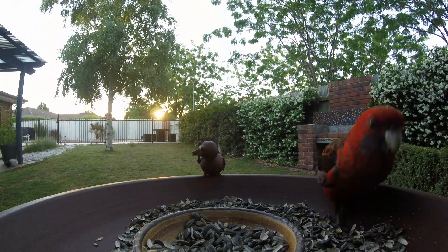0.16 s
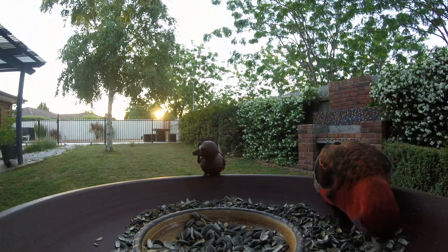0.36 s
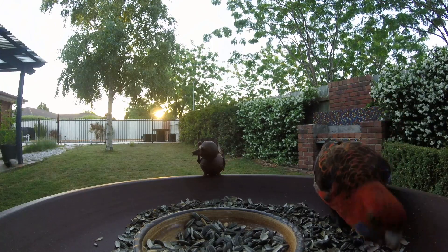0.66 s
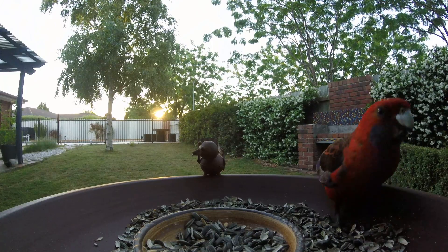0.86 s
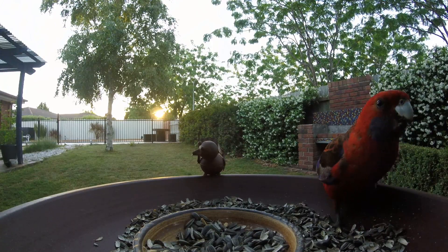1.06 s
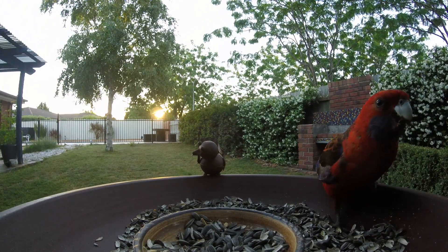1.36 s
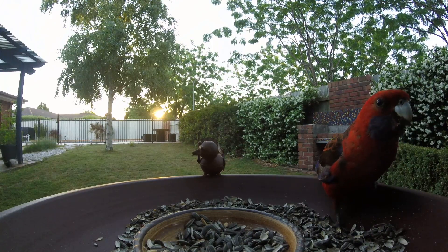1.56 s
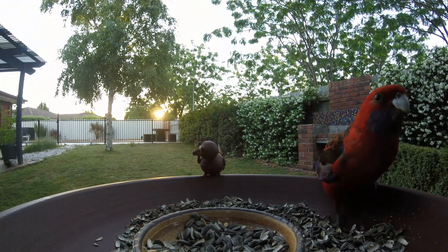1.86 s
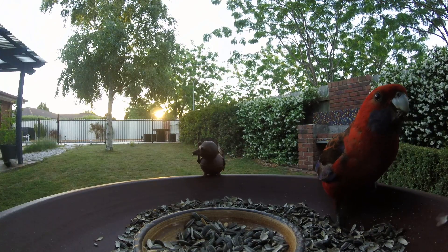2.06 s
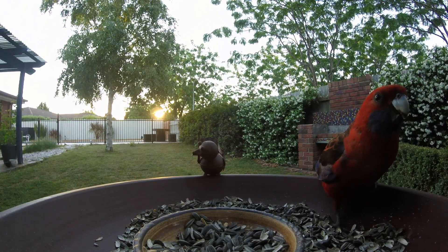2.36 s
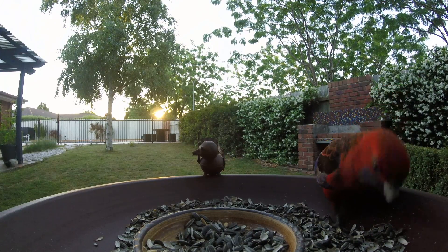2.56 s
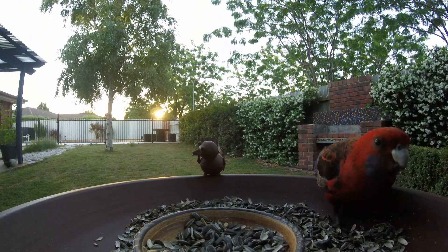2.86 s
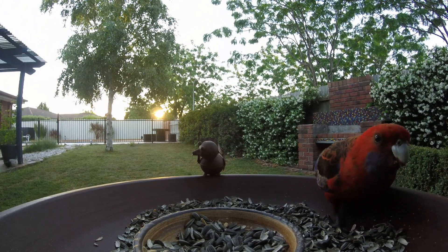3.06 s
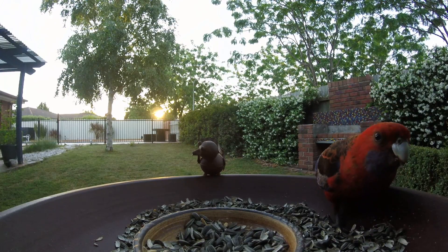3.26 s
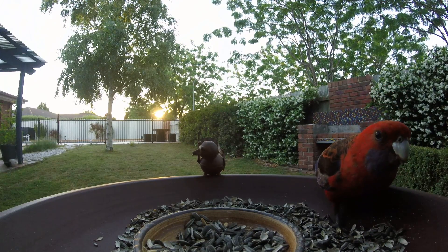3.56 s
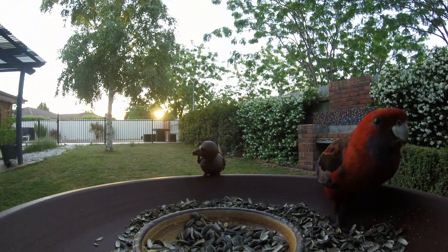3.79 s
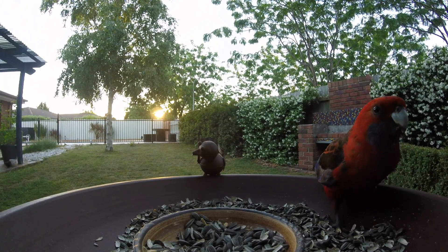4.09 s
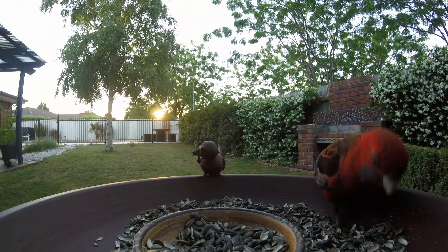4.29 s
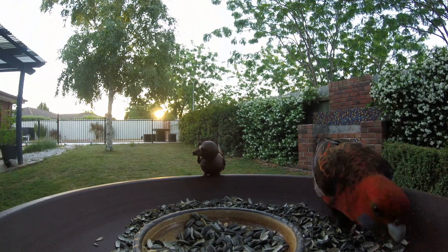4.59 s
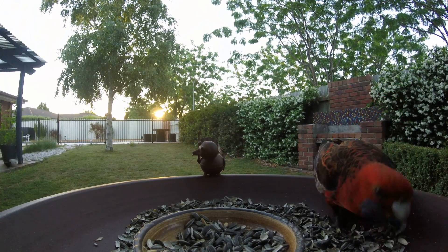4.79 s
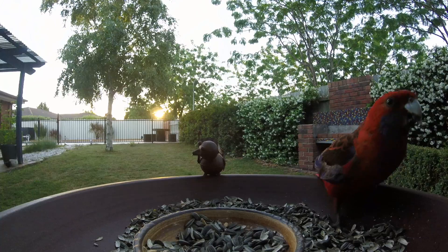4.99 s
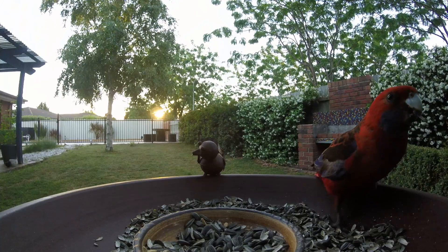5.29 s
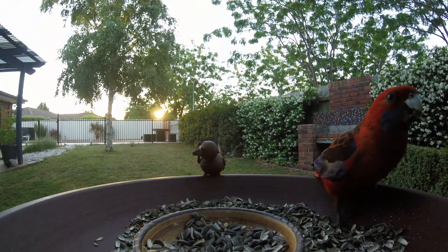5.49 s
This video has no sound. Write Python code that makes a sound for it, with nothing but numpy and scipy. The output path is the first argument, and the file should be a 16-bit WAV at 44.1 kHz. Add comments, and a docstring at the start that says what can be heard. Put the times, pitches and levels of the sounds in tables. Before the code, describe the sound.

A parrot feeds on seeds in a wide dish, right beside a microphone mounted on it. A light tap is followed by short beak scrapes and a peck that sets the dish booming low. A shell snaps sharply, smaller cracks follow, and a husk hits the rim with a bright, ringing clack. Near the end come more scrapes and a faint seed rustle. A quiet garden rushes softly behind.

```python
"""A parrot feeds on a wide dish in a quiet garden, right by a microphone mounted on that dish.
Its beak digs in the seeds, drags over the dish and thumps it; husks drop on the rim and make it ring.
Contacts knock the microphone mount too, and the bird's shifting weight makes the stand hum.
Seeds snap in the beak, close up, with the soft rush of the garden behind."""
import sys
import numpy as np
from scipy import signal
from scipy.fft import rfft, irfft
from scipy.io import wavfile
from scipy.ndimage import uniform_filter1d

SR = 44100
rng = np.random.default_rng(int(sys.argv[2]) if len(sys.argv) > 2 else 0)


def store_pcm(level_fs):
    """Save levels as 16-bit WAV."""
    pcm = np.round(np.clip(level_fs, -1, 1) * 32767).astype(np.int16)
    wavfile.write(sys.argv[1], SR, np.atleast_2d(pcm).T)


N = 248724

# The dish wall's dense, quickly dying modes. Each row: frequency in Hz, relative level in dB per Hz.
CLACK_SPECTRUM = [(400, -21), (950, -9), (1150, 1), (1400, 10.5), (1600, -26), (2100, -4), (2500, 1),
                  (3100, 0), (3800, -15.5), (6400, -18.5), (7500, -27), (14000, -47)]
# The mount's high resonances. Each row: frequency in Hz, relative level in dB, t60 in seconds.
MOUNT_MODES = [(2910, -18, 0.025), (3207, 1.5, 0.081), (4520, -5, 0.049), (5030, -3, 0.032),
               (6420, 1.5, 0.057), (6670, -9, 0.042), (10100, -20, .03)]
# The bird bows to the dish or straightens up.
# Each row: start in seconds, length in seconds, seed level in dB, stand level in dB.
BIRD_MOVES = [(0, 0.35, -75, -56.5), (0.876, 0.051, -66, -58), (2.6, .33, -71.5, -56.5),
              (4.435, 0.53, -66, -53)]


def amp(db):
    """Decibels to gain."""
    return 10 ** (np.asarray(db) / 20)


def unit_rms(x):
    """Scales to rms 1."""
    return x / np.sqrt(np.mean(x ** 2) + 1e-20)


def peaked(x, size=128):
    """Scales so that the loudest few milliseconds swing to about 1."""
    return x / (2 * np.sqrt(uniform_filter1d(x ** 2, size).max()) + 1e-20)


def add(mix, start, sound):
    """Mixes a sound in at a start given in seconds."""
    part = mix[max(round(start * SR), 0):][:len(sound)]
    part += sound[:len(part)]


def noise(spectrum, size):
    """Noise of rms 1 with a spectrum of (Hz, dB) points."""
    hz, db = np.transpose(spectrum)
    colour = amp(np.interp(np.log(np.fft.rfftfreq(size, 1 / SR) + 1), np.log(hz + 1), db))
    return unit_rms(irfft(rfft(rng.standard_normal(size)) * colour, size))


def ring(modes, t, polarity=1):
    """Dying (Hz, dB, t60) modes; at polarity -1 neighbours start opposed, so the ring builds up."""
    return sum(polarity ** k * amp(db - 60 * t / t60) * np.sin(2 * np.pi * hz * t)
               for k, (hz, db, t60) in enumerate(modes))


def garden(level_db=-55):
    """The soft, steady rush of the garden behind the feeder."""
    # Each row: frequency in Hz, relative level in dB per Hz.
    rush_spectrum = [(12, -26), (20, -7), (37, 1), (59, -2.5), (92, -3), (115, -3), (143, -2.5),
                     (229, -6.5), (525, -11), (674, -13.5), (841, -15), (1080, -16), (6360, -31),
                     (7300, -33.5), (15000, -45.5)]
    return amp(level_db) * noise(rush_spectrum, N)


def effort(start, length, build_db_per_s=45, settle_db_per_s=37):
    """Gain that builds up before a move of the bird, holds at 1 during it and settles after it."""
    t = np.arange(N) / SR
    before, after = np.maximum(start - t, 0), np.maximum(t - start - length, 0)
    return amp(-build_db_per_s * before - settle_db_per_s * after)


def stand_sway(perched_db=-67):
    """The bird's shifting weight hums in the low modes of the stand, with a dull rumble."""
    modes = [(31.6, 1, .58), (60, -12, .31), (89, -5, 1), (109, -8, .62), (130.6, -5.5, .42)]
    stand = ring(modes, np.arange(SR) / SR)
    weight = rng.standard_normal(N + len(stand) - 1)
    hum = unit_rms(signal.fftconvolve(weight, stand, "valid"))
    rumble = noise([(10, 3), (30, -2.5), (70, -3), (130, -10), (250, -22.5), (700, -60)], N)
    gain = amp(perched_db) + sum(effort(start, length) * amp(db) for start, length, _, db in BIRD_MOVES)
    return gain * unit_rms(hum + rumble)


def mount_knock(hz, t):
    """The microphone mount's damped low modes, whose pitch shifts with the place of contact."""
    # Each row: multiple of the knock pitch, relative level in dB, t60 in seconds.
    knock_modes = [(.86, -38, 0.046), (.945, 6, 0.061), (1.002, 11, 0.051), (1.045, 4.5, 0.032)]
    return ring([(hz * multiple, db, t60) for multiple, db, t60 in knock_modes], t)


def seed_rustle(taps_per_s=260, spread_db=3, knock_hz=1345, mount_db=-15, husk_db=-13, husk_t60=.018):
    """Loose seeds tap the dish lightly as the bird moves: a dry rustle coloured by the mount."""
    t = np.arange(SR // 4) / SR
    strength = amp(spread_db * np.minimum(rng.exponential(1, N), 4)) * rng.choice([-1, 1], N)
    taps = strength * (rng.random(N) < taps_per_s / SR)
    husk = amp(husk_db - 60 * t / husk_t60) * noise(CLACK_SPECTRUM, len(t))
    seed = mount_knock(knock_hz, t) + amp(mount_db) * ring(MOUNT_MODES, t) + husk
    gain = sum(effort(start, length) * amp(db) for start, length, db, _ in BIRD_MOVES)
    return gain * unit_rms(signal.fftconvolve(taps, seed)[:N])


def seed_snaps(hollow_hz=2650, hollow_db=-10.5, hollow_t60=.018, splinter_db=-11, splinter_t60=.013):
    """A shell splits: a few bright cycles, splinters, and a short knock in the hollow of the beak."""
    # Each row: start in seconds, level in dB, main pitch in Hz, t60 in seconds.
    splits = [(1.381, -39.5, 6450, .0045), (1.731, -53.5, 7200, .006), (1.7695, -52, 7250, .012),
              (1.866, -57, 7600, .006), (1.924, -61, 7400, .008), (4.625, -56, 8400, .022)]
    splinter_spectrum = [(1500, -25), (5000, -6), (7000, 2), (8400, 2), (9500, -12), (15000, -14)]
    out, t = np.zeros(N), np.arange(SR // 20) / SR
    attack = 1 - np.exp(-t / .00014)
    for start, db, hz, t60 in splits:
        crack = ring([(hz, 0, t60), (hz * 1.13, -8, t60), (hollow_hz, hollow_db, hollow_t60)], t)
        splinters = amp(splinter_db - 60 * t / splinter_t60) * noise(splinter_spectrum, len(t))
        add(out, start, amp(db) * peaked((crack + splinters) * attack))
    return out


def slips(length):
    """Force of a drag: a swell of tiny slips."""
    size = round(length * SR)
    return rng.standard_normal(size) * (rng.random(size) < .15) * signal.windows.tukey(size, .6)


def chatter(force, hz, share):
    """A dragging beak partly slips in step with a resonance."""
    t = np.arange(len(force)) / SR
    return force + share * np.sin(2 * np.pi * hz * t) * signal.windows.tukey(len(force), .4)


def strike(force, knock_hz, knock_db, ring_db, clack_db, tick_db, chatter_hz=0,
           clack_t60=.16, tick_t60=.049, mount_db=-1):
    """A contact knocks the mount, rings the dish wall and gives a dry tick."""
    # The wall's clear ring. Each row: frequency in Hz, relative level in dB, t60 in seconds.
    wall_modes = [(1128, -2, .11), (1279, -1, .13), (1362, -4, .17), (1620, -16, .28), (1736, -13, .28),
                  (1819, -9, .17), (2225, -5, .11), (2355, -16, .17), (2440, -20, .27), (2488, -2, .19),
                  (2694, -7, .33), (2763, -6, .26), (2858, -6, .18), (2897, 1, .19), (2950, -8, .14),
                  (3086, -10, .17), (3162, -2, .12), (3228, -17, .36), (3435, -13, .13), (3555, -9, .11),
                  (4086, -26, .18), (4393, -23, .2), (4732, -26, .18), (5114, -24, .2), (6234, -25, .18),
                  (6551, -18, .14), (6751, -21, .14)]
    # A husk's dry tick. Each row: frequency in Hz, relative level in dB per Hz.
    tick_spectrum = [(300, -13), (900, -21), (1400, -18), (2000, -30), (3000, 10), (3800, -1.5), (5000, -5),
                     (5700, -4), (6500, 6), (7200, -7), (10200, -7), (12000, -23), (15000, -27)]
    t = np.arange(SR // 2) / SR
    attack, knock_attack, tick_attack = (1 - np.exp(-t / rise_s) for rise_s in (.00083, .0024, .00021))
    knock = mount_knock(knock_hz, t) * knock_attack
    wall = ring(wall_modes, t) * attack
    clack = noise(CLACK_SPECTRUM, len(t)) * amp(-60 * t / clack_t60) * attack
    husk = noise(tick_spectrum, len(t)) * amp(-60 * t / tick_t60) * tick_attack
    tick = peaked(husk) + amp(mount_db) * peaked(ring(MOUNT_MODES, t) * attack)
    paths = [(chatter(force, knock_hz, share=.083), knock, knock_db),
             (chatter(force, chatter_hz, share=.097), wall, ring_db),
             (force, clack, clack_db), (force, tick, tick_db)]
    return sum(amp(db) * peaked(signal.fftconvolve(drive, body)) for drive, body, db in paths)


def husk_drops(hard_tap_db=-28.5, ring_growth=.54):
    """Husks land on the rim and bounce once, more weakly; softer taps have less of the clear ring."""
    # Each row: start and bounce delay in seconds, knock pitch in Hz, knock, wall and tick levels in dB.
    drops = [(0.0409, .0035, 1408, -36.5, -45.5, -35), (.7315, .004, 1380, -48, -62, -48),
             (2.119, .01, 1373, -23.5, -28.5, -33.5), (2.2212, .004, 1400, -53, -61, -55.5),
             (2.4347, .008, 1385, -42, -54, -41)]
    out, impulse = np.zeros(N), np.ones(1)
    for start, delay, hz, knock_db, wall_db, tick_db in drops:
        ring_db = wall_db + 4 + ring_growth * (wall_db - hard_tap_db)
        landing = strike(impulse, hz, knock_db, ring_db, wall_db, tick_db)
        bounce = strike(impulse, hz, knock_db - 2.5, ring_db - 19.5, wall_db - 2.5, tick_db - 8.5)
        add(out, start, landing)
        add(out, start + delay, bounce)
    return out


def beak_drags(chatter_hz=2526):
    """Beak and claws drag over the dish, chattering on a mode of its wall."""
    # Each row: start and length in seconds, knock pitch in Hz, knock, wall and tick levels in dB.
    drags = [(.638, 0.017, 1414, -32.5, -43.5, -42.5), (.655, 0.027, 1397, -51, -41.5, -46.5),
             (.692, 0.022, 1394, -43.5, -49, -65), (2.182, .018, 1414, -47, -48, -48.5),
             (2.582, 0.031, 1290, -52.5, -70, -67), (4.567, 0.039, 1345, -48, -50, -57),
             (4.658, 0.0128, 1366, -43.5, -43.5, -72), (4.853, 0.0081, 1360, -39.5, -52.5, -56),
             (4.998, 0.011, 1380, -54.5, -54, -64)]
    out = np.zeros(N)
    for start, length, hz, knock_db, wall_db, tick_db in drags:
        ring_db = wall_db - 5
        add(out, start, strike(slips(length), hz, knock_db, ring_db, wall_db, tick_db, chatter_hz))
    return out


def contact_low_cut(contacts, cut_hz=980):
    """Cuts the lows below about 1 kHz, keeping taps and drags thin and bright."""
    return signal.sosfilt(signal.butter(4, cut_hz, "highpass", fs=SR, output="sos"), contacts)


def peck_thump(start=.651, thud_db=-49, thud_t60=.39):
    """A peck sets the whole dish booming under the microphone in beating modes, with a dull thud."""
    # The dish flexing on its stand. Each row: frequency in Hz, level in dB, t60 in seconds.
    flex_modes = [(32.1, -45, 1.2), (62.6, -28.5, .16), (89.05, -41.5, 1.5), (109.98, -35.1, 1.62),
                  (129.95, -26.8, .96), (146.7, -35.5, 1.2), (188.5, -41, .33), (212, -50, .6)]
    out, t = np.zeros(N), np.arange(2 * SR) / SR
    boom = ring(flex_modes, t, polarity=-1)
    thud = noise([(100, -20), (220, 0), (400, -3), (850, .5), (1300, -2), (3000, -48)], len(t))
    add(out, start, boom + amp(thud_db - 60 * t / thud_t60) * thud)
    return out


def scene():
    """One microphone on the feeder: the parrot close up, the garden behind."""
    contacts = contact_low_cut(husk_drops() + beak_drags())
    return (contacts + peck_thump() + seed_snaps() + seed_rustle() + stand_sway() + garden())[None]


def record(dry):
    """The recorder cuts the treble above 15.1 kHz."""
    lowpass = signal.firwin(511, 15100, window=("kaiser", 9), fs=SR)
    return signal.oaconvolve(dry, lowpass[None], "same")


dry = scene()
out = record(dry)
store_pcm(out)
```